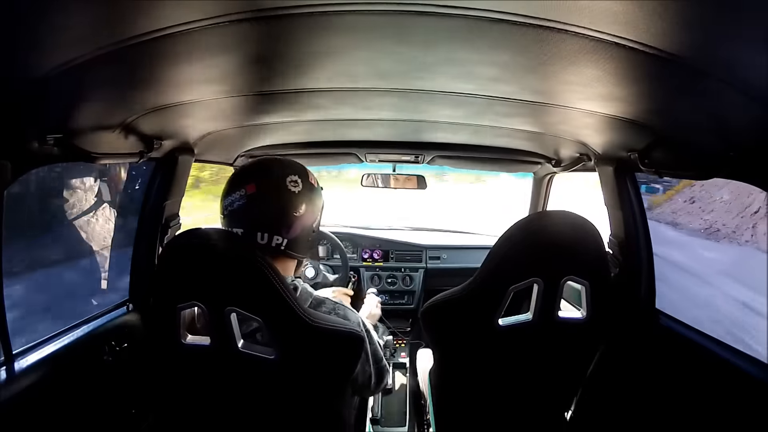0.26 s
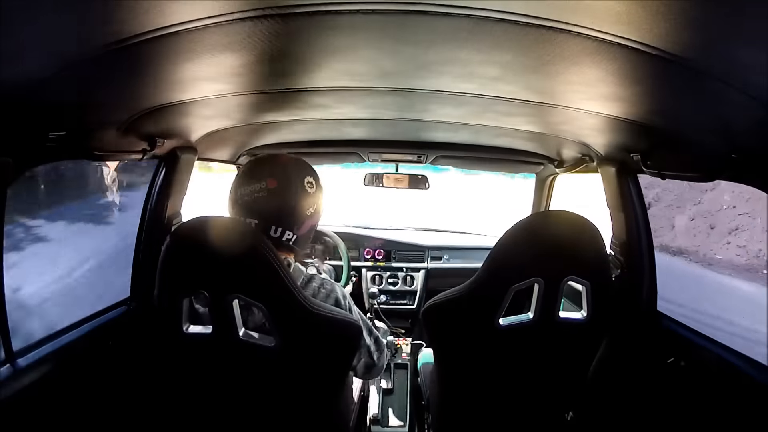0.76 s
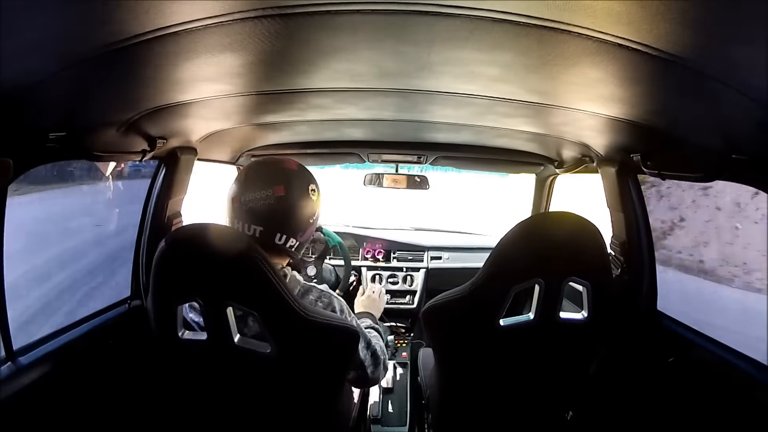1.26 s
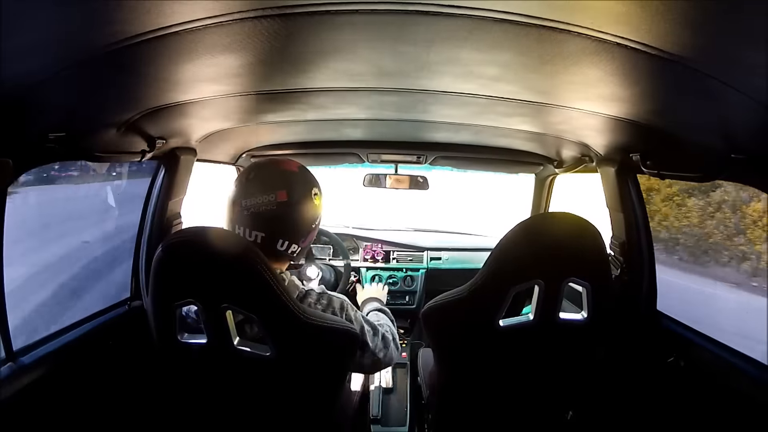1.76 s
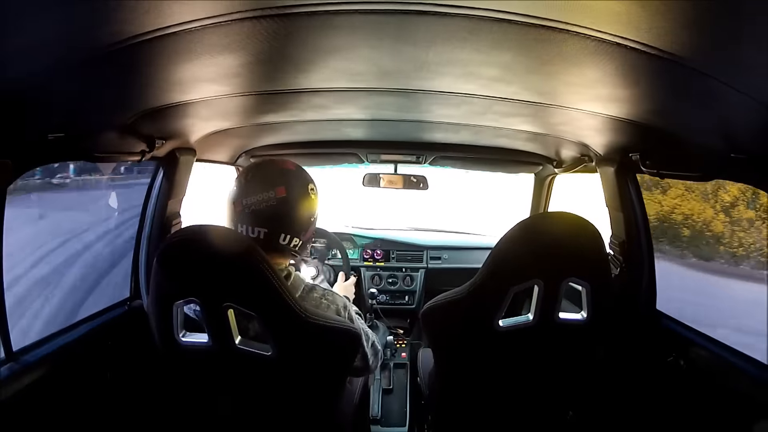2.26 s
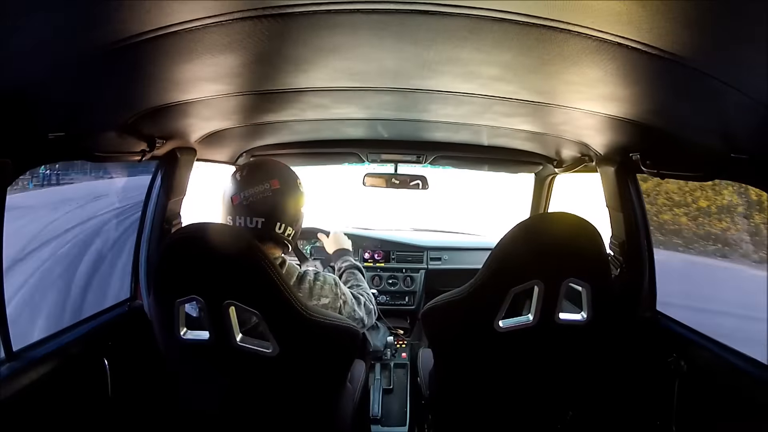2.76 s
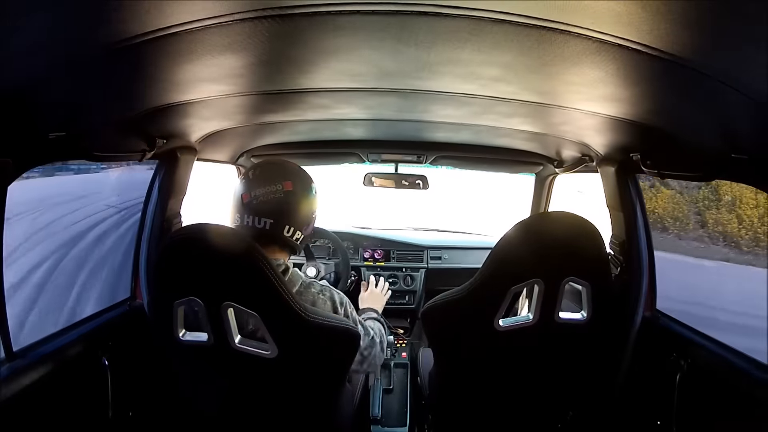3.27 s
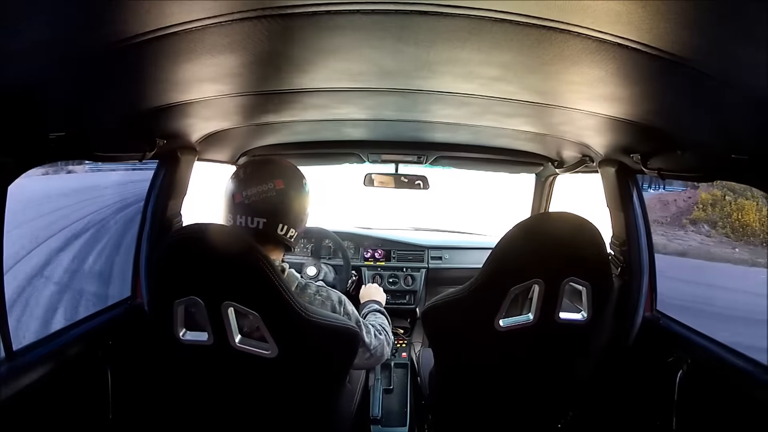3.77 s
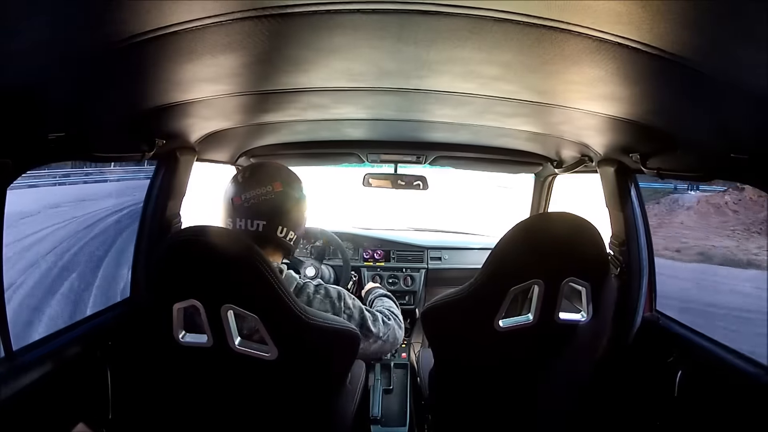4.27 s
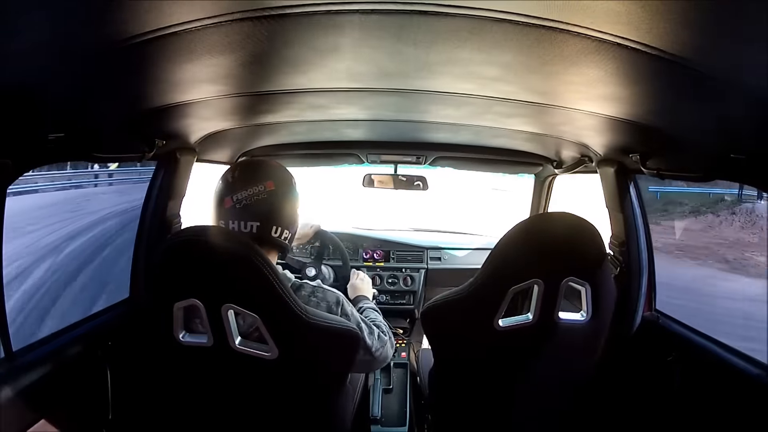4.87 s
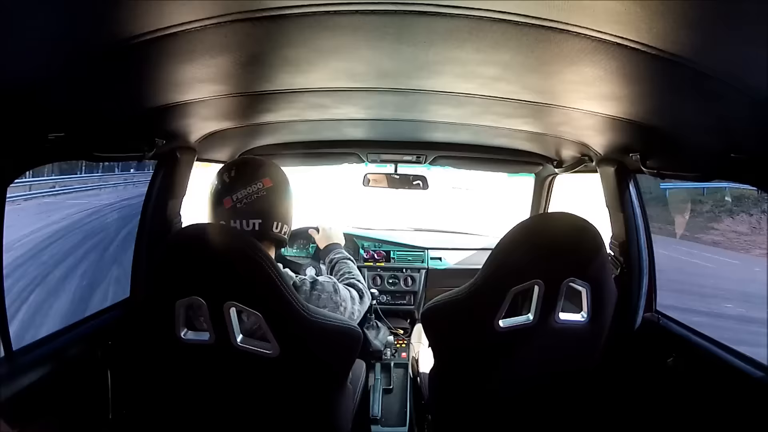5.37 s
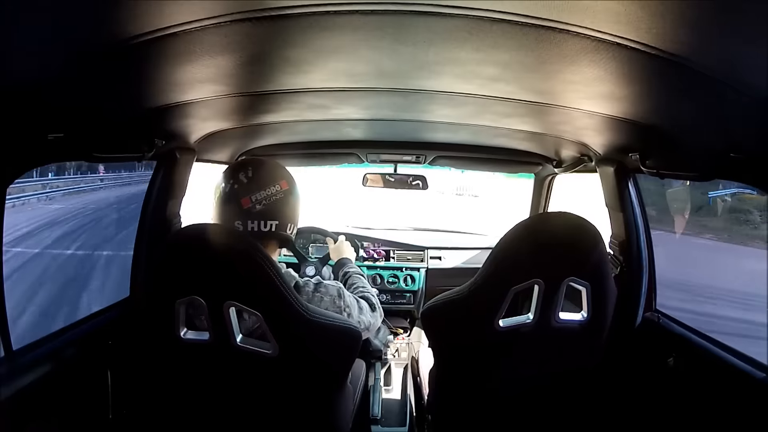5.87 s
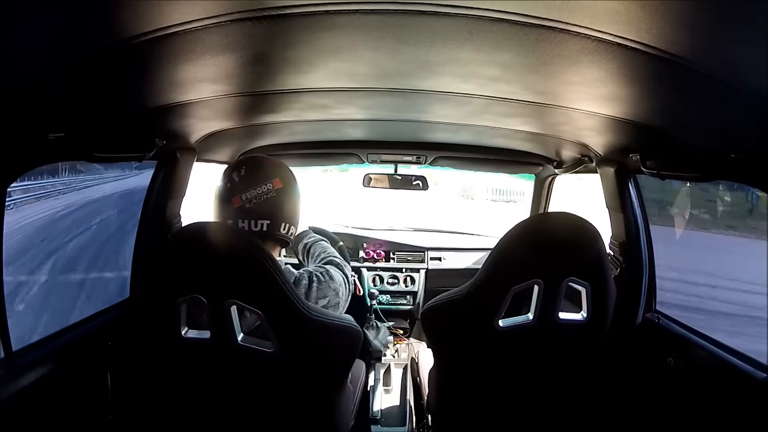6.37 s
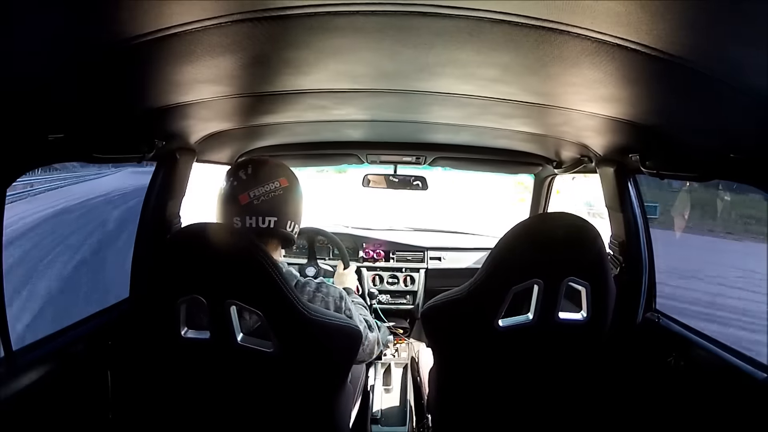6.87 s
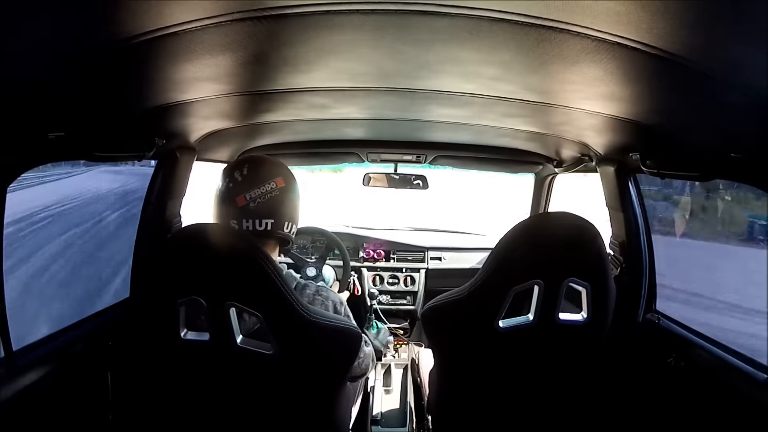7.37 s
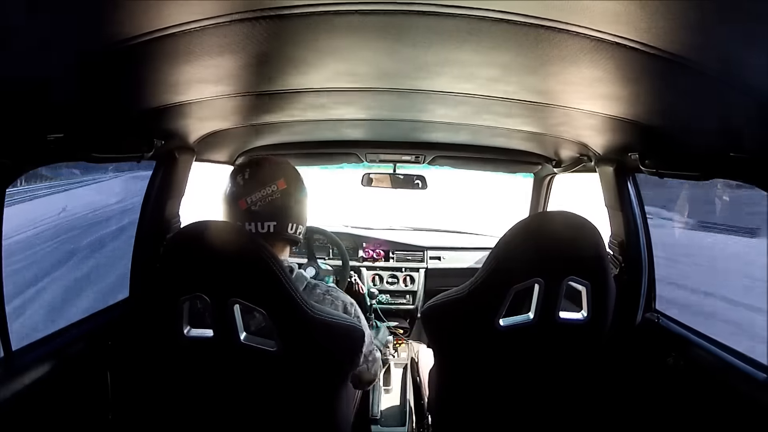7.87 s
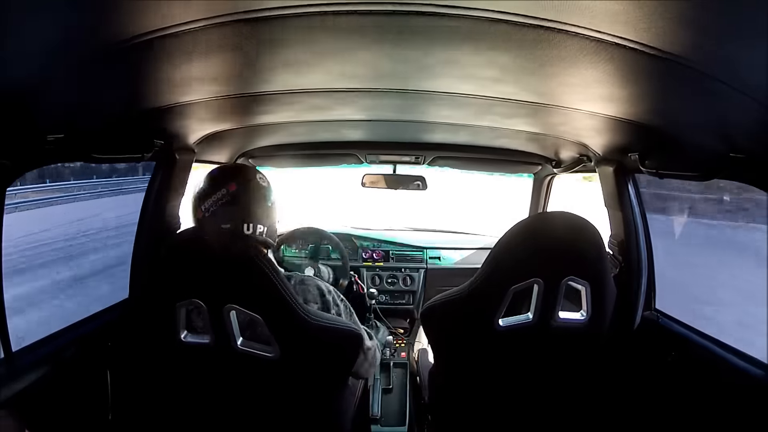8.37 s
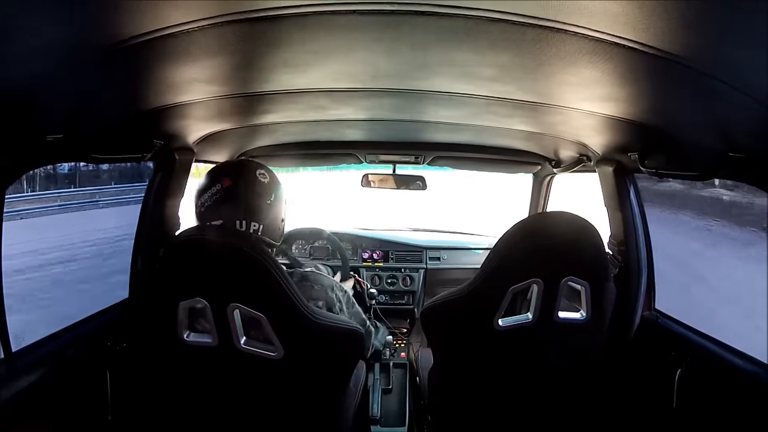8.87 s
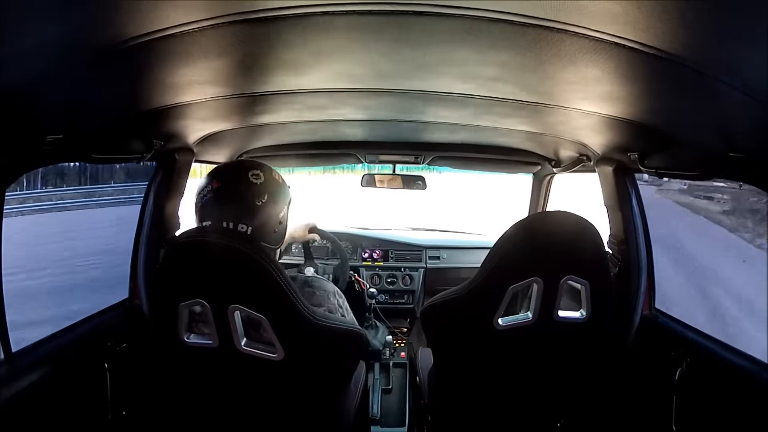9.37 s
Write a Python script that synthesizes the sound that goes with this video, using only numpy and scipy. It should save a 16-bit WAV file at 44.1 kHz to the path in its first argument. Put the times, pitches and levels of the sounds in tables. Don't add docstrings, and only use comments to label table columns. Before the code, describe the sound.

Inside a bare car cabin, a hard buzzing diesel engine surges and drops while tyres howl in slides over booming low rumble.

```python
import sys
import numpy as np
from scipy import signal
from scipy.fft import rfft, irfft, next_fast_len
from scipy.io import wavfile
from scipy.ndimage import uniform_filter1d, minimum_filter1d, map_coordinates

SR = 44100
rng = np.random.default_rng(int(sys.argv[2]) if len(sys.argv) > 2 else 0)


def pcm_store(signal):
    levels = np.round(np.clip(np.atleast_2d(signal), -1, 1) * 32767)
    wavfile.write(sys.argv[1], SR, levels.astype(np.int16).T)


def linear_from_db(decibels):
    return 10 ** (np.asarray(decibels, float) / 20)


N = 424241
FULL_CYCLE_HZ = 46.3
HOLD_HZ = 12000

# frequency in Hz, gain in dB.
PANEL_COLOUR = [(180, -30), (300, -1.5), (314, -6.5), (408, -12), (585, -18), (683, -5), (789, -9),
                (903, -1), (989, -9.5), (1150, 2.5), (1260, -8), (1480, -3.5), (1800, -15), (2070, -2),
                (2600, -16.5), (3380, -50), (5720, -120)]
# frequency in Hz, gain in dB.
HOUSING_COLOUR = [(2100, 0.5), (2380, 4.5), (2480, -3), (2800, 4.5), (3050, -3.5), (3250, -4.5), (3500, -7),
                  (3700, -3), (3900, -11.5), (4300, -18.5), (5500, -14.5), (5800, -18), (5990, -40)]
# time in seconds, pitch in Hz.
BOOM_PITCH = [(0.0, 69.14), (0.24, 70.94), (0.29, 63.26), (0.99, 70.16), (1.71, 62.88), (1.82, 69.13),
              (5.06, 62.95), (5.76, 68.5), (6.05, 60.34), (7.02, 62.43), (7.21, 72.02), (7.5, 65.08),
              (9.62, 61.3)]
# time in seconds, level in dB.
ROAD_ROUGHNESS = [(0.0, -24), (0.21, -24.5), (0.77, -18), (1.7, -17.5), (2.6, -27), (3.8, -20.5),
                  (4.1, -24.5), (5.7, -16.5), (7.9, -16.5), (8.12, -15), (8.22, -24), (8.6, -14.5),
                  (9.1, -13.5), (9.62, -24.5)]
# frequency in Hz, level in dB per Hz.
RUMBLE_COLOUR = [(12, -51), (22, -14.5), (31, -8), (43, -9.5), (55, 5.5), (80, -4.5), (105, -7), (118, -9),
                 (135, -17.5), (180, -23), (420, -30), (560, -46.5), (920, -120)]
# time in seconds, boom level in dB, half length in seconds.
ROAD_BUMPS = [(0.558, -10, 0.081), (0.763, -7.5, 0.096), (1.079, -7.5, 0.02), (1.237, -7, 0.05),
              (1.433, -1, 0.048), (1.696, -8.5, 0.093), (1.834, -3.5, 0.033), (1.983, -11, 0.087),
              (2.254, 5.5, 0.042), (2.423, -3, 0.03), (2.63, -9.7, 0.4), (3.243, -7.5, 0.12),
              (3.546, -8.5, 0.021), (3.787, -11.5, 0.06), (3.907, -4.2, 0.03), (4.384, -5, 0.038),
              (4.568, -5, 0.055), (4.73, -6, 0.14), (5.35, -9, 0.16), (5.616, -13, 0.02038),
              (5.992, -8.5, 0.05), (6.233, -9, 0.033), (6.396, -13.5, 0.034), (6.597, -4, 0.036),
              (6.865, -13.5, 0.17), (7.875, -11, 0.069), (8.192, -6, 0.15), (9.036, -11, 0.053),
              (9.245, -4, 0.032), (9.37, -4.5, 0.018)]
# time in
# seconds, peak in dB.
BRIGHT_TICKS = [(0.5493, -47.5), (0.572, -57), (0.5857, -44), (0.63, -47.5), (1.4157, -53), (2.2179, -49.5),
                (2.2543, -43), (2.3082, -51), (4.369, -43.5), (4.3914, -49), (4.7511, -60), (6.559, -37),
                (9.25, -38.5), (9.3761, -46)]
# start in seconds, level in dB, pitch in Hz, 60 dB decay in seconds.
RINGING_KNOCKS = [
    (8.224, -12.5, 248, 0.0314),
    (9.26, -26.5, 3620, 0.33),
]
# time in seconds, three times the slip rate in Hz, level in dB, harshness in dB.
SLIDES = [
    [(0.0, 3070, -22, -9.5), (0.13, 3006, -28.5, -17), (0.3, 2863, -42, -8)],
    [(0.5, 2804, -45, -1), (0.8, 2814, -31, 3), (0.99, 2860, -23, 1.5), (1.25, 2925, -30, 4),
     (1.41, 2940, -23.5, -5), (1.63, 2912, -36.5, -8), (1.82, 3195, -29.5, -1), (2.15, 3175, -34.5, 5.5),
     (2.45, 2955, -51, -2)],
    [(2.55, 3135, -37, 1), (2.6, 3116, -26.5, 6), (2.85, 3050, -27, 6.5), (3.0, 3045, -27, -3.5),
     (3.5, 3005, -27.5, 2), (3.65, 3045, -25, 5), (3.92, 3070, -26.5, 5.5), (4.08, 3030, -26.5, -2),
     (4.2, 2950, -56, 0)],
    [(8.6, 2916, -61, -5), (8.82, 2960, -30.5, -11), (9.1, 2866, -35, 0), (9.4, 2896, -32.5, -5),
     (9.62, 2920, -22.5, -3.5)],
]
# time in seconds, firing rate in Hz.
FIRING_RATE = [(0.0, 240), (0.3, 288), (0.55, 193), (1.12, 179), (1.53, 241), (2.15, 247), (2.8, 128),
               (3.56, 141), (4.31, 279), (4.68, 297), (5.22, 279.2), (6.83, 277.3), (7.15, 262.5),
               (7.6, 260), (8.4, 277), (8.62, 211), (9.31, 287), (9.62, 194)]
# time in seconds, sag in Hz (negative for a surge), half length in
# seconds.
REV_SAGS = [
    (1.82, 17, 0.11),
    (3.2, -7, .25),
    (4.48, -5, .13),
    (5.03, 20, .11),
    (9.1, -7, .12),
]
# time in seconds, load in dB, half-rate lines in dB, bark in dB.
PEDAL_MOVES = [(0, -3, -7, 3.5), (0.222, 2.5, 5, 2), (0.338, -8.5, -7, -2.5), (.62, -6, -2, 1.5),
               (.85, -4.5, -8, -7.5), (1.16, -0.5, 0, 0.5), (1.43, 5, 5, 4), (1.55, -1, 7, -2),
               (1.95, 2, 5.5, -2.5), (2.2, 2.5, 5.5, -2), (2.43, -0.7, -8, 0.5), (3.56, -0.5, -1, 3),
               (3.97, 5.5, -15, 3), (4.13, -0.5, 14, 1), (4.31, 5.5, 10, 0.5), (4.4, 3.5, 12.5, 0),
               (4.85, 8.5, 12, 0.5), (4.919, 7, 4, -3.5), (5.188, 13.5, -10, -1.5), (6.87, 9.5, 2.5, -1),
               (7.13, 5.5, 9, 1.5), (7.6, 3.5, 10.5, 3.5), (8.23, -6, -1, 2.5), (8.3, 3.5, -1, 0.5),
               (8.37, 4.5, 0, 5.5), (8.48, -6.5, 6, 2), (8.646, 0.5, 13.5, 5), (9.228, 9.5, 7, 0),
               (9.36, -2, 2, -3.5), (9.5, -0.5, 10, 2.5)]
# centre in Hz, width in Hz, level in dB.
PIPE_MODES = [(132.6, 26, -28.5), (163, 21, -25.5), (199.5, 32, -25.5), (249.3, 36, -24),
              (285.5, 23, -29.5), (392, 72, -26), (441.4, 49, -28.5), (555, 56, -30.5), (718, 69, -20),
              (848, 89, -20)]
# multiple of the cycle rate, level in dB.
STRONG_LINES = [(3, -24), (5, -20.5), (9, -28), (10, -29), (14, -31), (15, -26), (16, -30), (20, -20),
                (21, -32), (23, -26), (24, -8), (25, -29), (26, -29), (27, -30), (30, -26), (32, -24),
                (33, -27), (35, -27), (36, -21), (41, -29), (42, -27), (44, -27), (45, -24), (46, -25),
                (47, -25), (48, -30), (49, -26), (51, -28)]
# multiple of the cycle rate, level in dB.
WEAK_LINES = [(7, -37), (22, -32), (34, -33), (38, -39), (50, -34), (54, -40), (66, -35), (88, -47)]
BANK_LINES = (3, 9, 21, 27, 33)
# multiple of the firing rate, level in dB.
SHAFT_LINES = [(0.1055, -40), (0.4272, -23), (.568, -27), (.64, -30.5)]
# time in seconds, level in dB.
GEAR_HOLD = [
    (4.8, -29),
    (5.05, -9),
    (7.0, -8.5),
    (8.0, -10),
    (8.3, -33),
]


def unit(x):
    return x / np.sqrt(np.mean(x ** 2) + 1e-20)


def along(points, x):
    position, value = np.transpose(points)
    return np.interp(np.log(x + 1), np.log(position + 1), value)


def curves(rows):
    s, *columns = np.transpose(rows)
    return [np.interp(np.arange(N) / SR, s, column) for column in columns]


def wobble(rate):
    knots = rng.standard_normal(int(N * rate / SR) + 4)
    return map_coordinates(knots, [np.arange(N) * rate / SR])


def smooth(x, seconds):
    return uniform_filter1d(x, size=round(seconds * SR))


def bumps(rows):
    t = np.arange(0, N, 64) / SR
    bells = sum(height * np.exp(-((t - s) / half) ** 2) for s, height, half in rows)
    return np.interp(np.arange(N) / SR, t, bells)


def filtered(x, response):
    m = next_fast_len(N + SR // 2)
    return irfft(rfft(x, m) * response(np.fft.rfftfreq(m, 1 / SR)), m)[..., :N]


def noise(spectrum):
    return unit(filtered(rng.standard_normal(N), lambda hz: linear_from_db(along(spectrum, hz))))


def resonance(centre_hz, width_hz):
    return lambda f: 1j * f * width_hz / (centre_hz ** 2 - f * f + 1j * f * width_hz)


def panels(hz):
    return linear_from_db(along(PANEL_COLOUR[1:-2], hz))


def cabin():
    calm_db = -17.5 * (np.arange(N) < 0.47 * SR)
    between = linear_from_db(-19.5 + calm_db + 1.9 * wobble(9.3))
    jolts = bumps([(s, linear_from_db(db) ** 2, half) for s, db, half in ROAD_BUMPS])
    size = np.sqrt(between ** 2 + jolts)
    boom_hz, = curves(BOOM_PITCH)
    phase = 2 * np.pi * np.cumsum(boom_hz * (1 + 0.02555 * wobble(14))) / SR
    boom = size * linear_from_db(2.0 + 0.76 * wobble(16)) * np.sin(phase)
    loose = resonance(66.0, 26.0)
    boom += size * linear_from_db(-9.0) * unit(filtered(rng.standard_normal(N), lambda hz: loose(hz) ** 2))

    road_db, = curves(ROAD_ROUGHNESS)
    mode = resonance(94.95, 17.8)
    upper = linear_from_db(road_db - 3.5) * unit(filtered(rng.standard_normal(N), lambda hz: mode(hz) ** 2))
    rumble = linear_from_db(0.14 * road_db - 16.5 + 2.0 * wobble(6)) * noise(RUMBLE_COLOUR)
    low = boom + upper + rumble
    give = minimum_filter1d(1.05 / np.maximum(np.abs(low), 1.05), size=1800)
    return low * uniform_filter1d(give, size=1200)


def bright_ticks():
    out = np.zeros(N + SR)
    t = np.arange(SR // 40) / SR
    fall = linear_from_db(-60 * t / 0.009)
    for s, db in BRIGHT_TICKS:
        out[round(s * SR):][:len(t)] += linear_from_db(db + 32.5) * fall * rng.standard_normal(len(t))
    out = filtered(out[:N], lambda hz: hz ** 8 / (hz ** 8 + 3900.0 ** 8))

    t = np.arange(SR // 10) / SR
    for s, db, hz, t60 in RINGING_KNOCKS:
        ring = linear_from_db(db - 60 * t / t60) * (1 - np.exp(-t / 0.0015)) * np.sin(2 * np.pi * hz * t)
        out[round(s * SR):][:len(t)] += ring
    return out


def tyres():
    out, t = np.zeros(N), np.arange(N) / SR
    third_hz, level_db, harsh_db = curves([row for rows in SLIDES for row in rows])
    fade = 0
    for rows in SLIDES:
        inside = np.minimum(t - rows[0][0] + 0.017, rows[-1][0] - t + 0.12)
        fade = fade + np.clip(inside / 0.032, 0, 1)
    bright_db = 0.013 * (third_hz - 2950)
    second_db = -7.5 + 0.65 * harsh_db + bright_db
    upper_db = -1.5 + harsh_db + 1.7 * bright_db
    for wheel, scatter in ((1.001, 0.01962), (1.08, 0.04)):
        slip_hz = third_hz / 3 * wheel * (1 + 0.012 * wobble(25) + scatter * wobble(300))
        phase = 2 * np.pi * np.cumsum(slip_hz) / SR
        upper = np.sin(3 * phase) + 0.5 * np.sin(4 * phase) + 0.36 * np.sin(5 * phase)
        howl = np.sin(phase) + linear_from_db(second_db) * np.sin(2 * phase) + linear_from_db(upper_db) * upper
        out += fade * linear_from_db(level_db + 1.0 + 2.85 * wobble(60) + 0.96 * wobble(20)) * howl
    return filtered(out, panels)


def pipe(hz):
    coarse = hz[::64]
    power = sum((linear_from_db(db) / (1 + (2 * (coarse - centre) / width) ** 2)) ** 2
                for centre, width, db in PIPE_MODES)
    return np.repeat(np.sqrt(power), 64)[:N]


def exhaust_note(firing_hz, firing, load_db, overrun_db, bark_db):
    first_db = 1.5 + 0.1 * load_db + 2.55 * wobble(25)
    second_db = -8 + 0.55 * load_db + 1.3 * overrun_db + 1.9 * wobble(25)
    third_db = -15 + 0.84 * load_db + overrun_db + 1.94 * wobble(30)
    note = pipe(firing_hz) * linear_from_db(first_db) * np.sin(firing)
    note += pipe(2 * firing_hz) * linear_from_db(second_db) * np.sin(2 * firing + 1)
    note += pipe(3 * firing_hz) * linear_from_db(third_db) * np.sin(3 * firing + 2)
    return note * linear_from_db(bark_db)


def cycle_wave(cycles, lines):
    grid = np.arange(4097) / 4096
    wave = np.zeros(4097)
    for k, db in lines:
        hz = k * FULL_CYCLE_HZ
        level = linear_from_db(db - along(HOUSING_COLOUR, hz)) / panels(hz)
        wave += level * np.sin(2 * np.pi * (k * grid + rng.random()))
    return np.interp(cycles % 1, grid, wave)


def repeating_comb(cycles, high_db, uneven_db, odd_db):
    strong = dict(STRONG_LINES)
    lines = [(k, strong.get(k, along(WEAK_LINES, k) + 4 * rng.normal())) for k in range(3, 89)]
    even = cycle_wave(cycles, [row for row in lines if row[0] > 18 and row[0] % 6 == 0])
    uneven = cycle_wave(cycles, [row for row in lines
                                 if row[0] > 4 and row[0] % 6 and row[0] not in BANK_LINES])
    uneven += linear_from_db(odd_db) * cycle_wave(cycles, [row for row in lines if row[0] in BANK_LINES])
    comb = linear_from_db(high_db + 0.79 * wobble(40)) * even + linear_from_db(uneven_db + 1.05 * wobble(30)) * uneven
    return filtered(comb, panels)


def combustion_clatter(firing, clatter_db, repeat_db):
    gate = 1 + 0.071 * np.cos(firing) + 0.03 * np.cos(firing * 2 / 3)
    hiss = filtered(gate * rng.standard_normal(N),
                    lambda hz: panels(hz) * hz ** 4 / (hz ** 4 + 193.0 ** 4) * (hz < 6000))
    fizz = filtered(gate * rng.standard_normal(N), lambda hz: (hz > 3300) * (hz < 6000))
    clatter = linear_from_db(clatter_db - repeat_db + 7.5 + 1.2 * wobble(14)) * unit(hiss)
    return clatter + linear_from_db(2.117 * clatter_db + 18.5) * unit(fizz)


def driveline(cycles, firing):
    road_db, = curves(ROAD_ROUGHNESS)
    crank = linear_from_db(road_db + 2.5 + 0.5 * wobble(12)) * np.sin(2 * np.pi * 2 * cycles)
    in_gear = linear_from_db(along(GEAR_HOLD, np.arange(N) / SR))
    shaft = sum(linear_from_db(db + 2.7 * wobble(5.8)) * np.sin(ratio * firing) for ratio, db in SHAFT_LINES)
    return in_gear * shaft + filtered(crank, resonance(93.6, 12))


def engine():
    flywheel_s, pedal_s = 0.07, 0.05
    t = np.arange(N) / SR
    firing_hz = smooth(curves(FIRING_RATE)[0], flywheel_s) - bumps(REV_SAGS)
    moves, *settings = np.transpose(PEDAL_MOVES)
    latest = np.searchsorted(moves, t, "right") - 1
    load_db, odd_db, bark_db = [smooth(column[latest], pedal_s) for column in settings]
    held_s = smooth(t - moves[latest], pedal_s)
    repeat_db = np.maximum(load_db, 0)
    overrun_db = np.minimum(load_db, 0)

    cycles = np.cumsum(firing_hz * (1 + 0.0006 * wobble(30))) / SR / 6
    firing = 2 * np.pi * 6 * cycles
    high_db = -41 + 1.31 * load_db + 0.8 * bark_db - 0.0448 * (firing_hz - 6 * FULL_CYCLE_HZ)
    high_db += 0.28 * (repeat_db - 4.5) + 11.5
    clatter_db = -38.5 + 1.095 * load_db - 0.8 * held_s
    uneven_db = clatter_db + overrun_db + 0.076 * repeat_db + 12.0

    out = exhaust_note(firing_hz, firing, load_db, overrun_db, bark_db)
    out += repeating_comb(cycles, high_db, uneven_db, odd_db)
    out += combustion_clatter(firing, clatter_db, repeat_db)
    return out + driveline(cycles, firing)


def scene():
    return (cabin() + bright_ticks() + tyres() + engine())[None]


def band_limit(x):
    return signal.sosfilt(signal.butter(12, 15410, fs=SR, output="sos"), x)


def record(dry):
    dull = filtered(dry, lambda hz: linear_from_db(along(HOUSING_COLOUR, hz)))
    clipped = dull / (1 + np.abs(dull / 1.052) ** 16) ** (1 / 16)
    low_band = filtered(clipped, lambda hz: hz < HOLD_HZ / 2)
    sampled = low_band * (1 + 2 * np.cos(2 * np.pi * HOLD_HZ * np.arange(N) / SR))
    held = filtered(sampled, lambda hz: np.sinc(hz / HOLD_HZ) * (hz < 15400))
    return band_limit(np.clip(held, -1, 1))


dry = scene()
out = record(dry)
pcm_store(out)
```